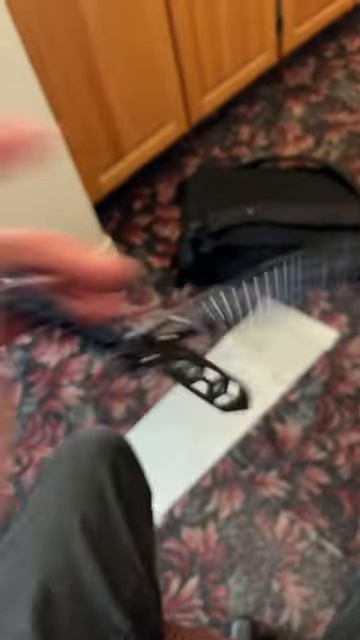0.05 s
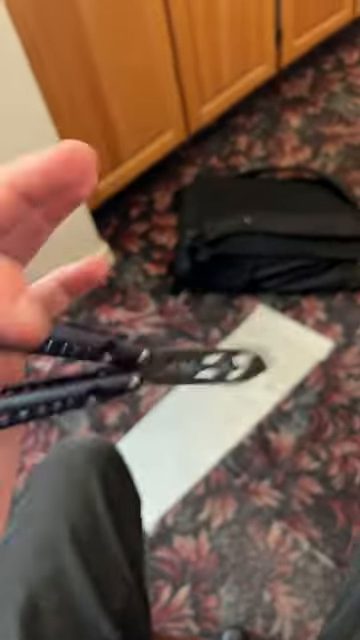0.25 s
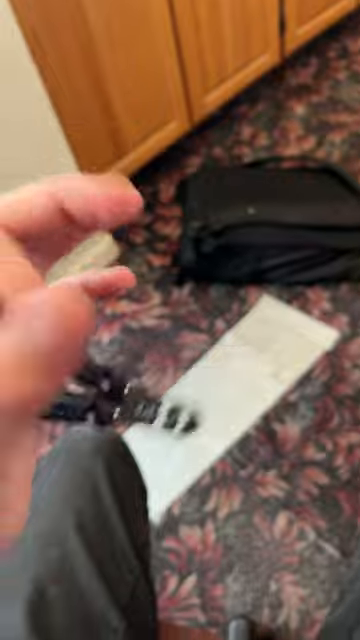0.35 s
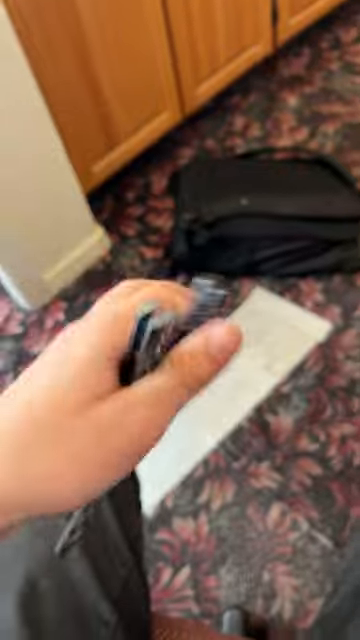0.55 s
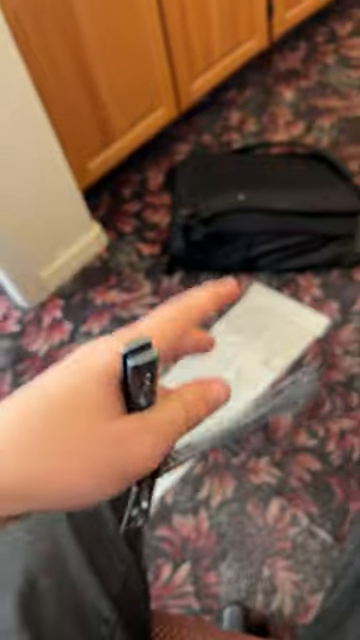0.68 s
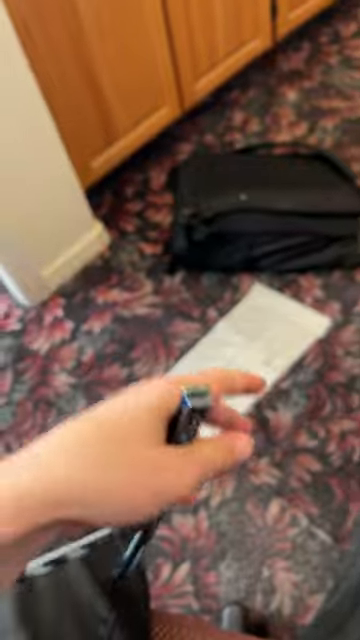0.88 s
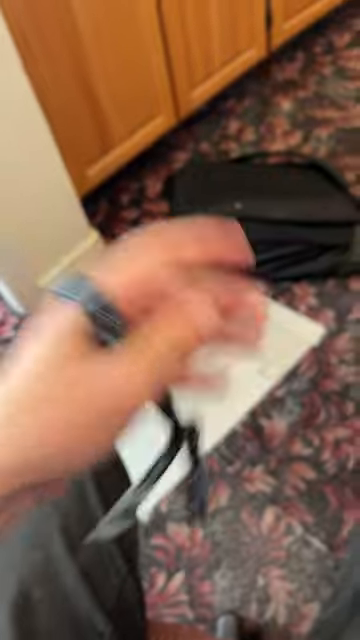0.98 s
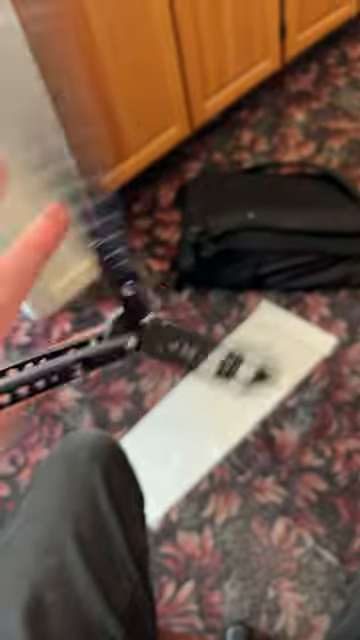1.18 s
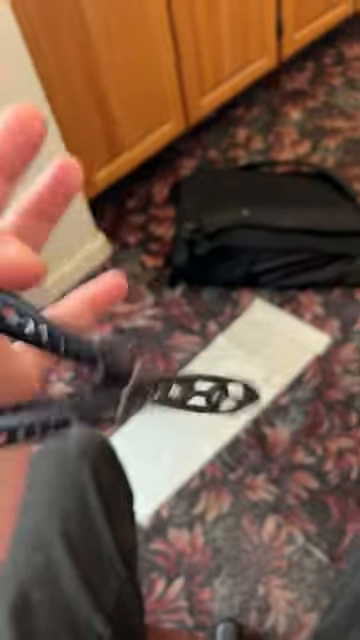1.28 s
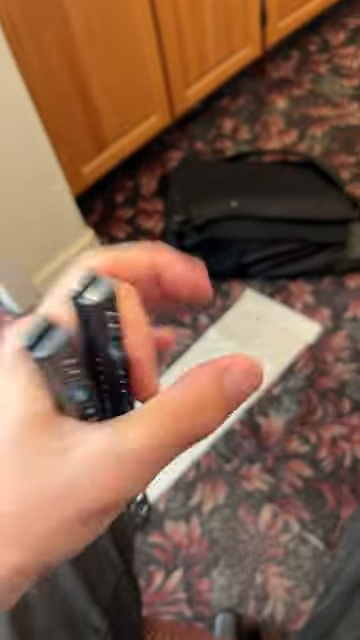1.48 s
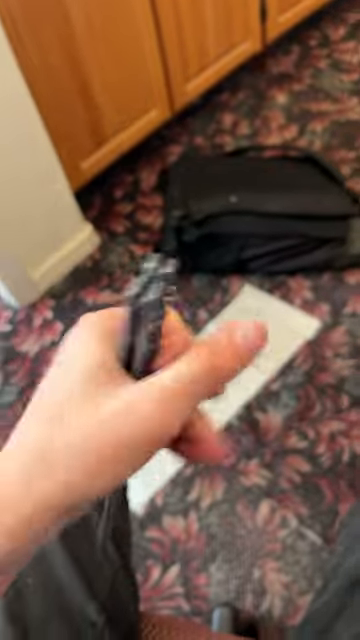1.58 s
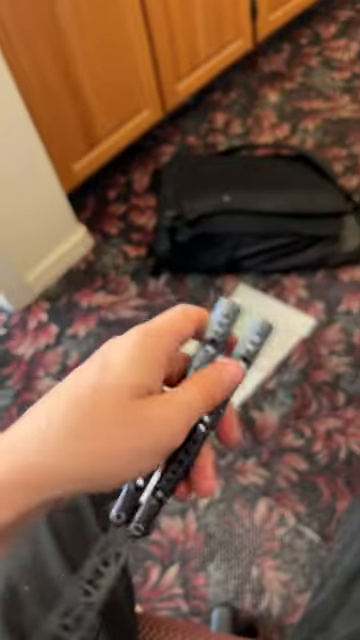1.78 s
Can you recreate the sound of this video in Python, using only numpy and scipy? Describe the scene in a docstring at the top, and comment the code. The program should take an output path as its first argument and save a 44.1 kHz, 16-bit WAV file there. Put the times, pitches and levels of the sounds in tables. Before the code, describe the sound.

A butterfly knife is flipped close to the microphone. Its metal handles tick, then clap together in a quickening rattle. A few lone ticks follow, then a second flip, over a quiet room's faint low hum.

```python
"""A low hum fills a quiet carpeted room. Close to the microphone, a hand flips a butterfly knife.
First the loose handles tick as they swing round. Then they clap together and bounce ever faster,
until the rattle closes into a short buzz. At each touch the steel rings briefly and the room answers.
A few lone ticks follow. Then the hand swishes softly and flips the knife again: ticks, claps, buzz."""
import sys
import numpy as np
from scipy import signal
from scipy.fft import rfft, irfft
from scipy.io import wavfile

SR = 44100
rng = np.random.default_rng(int(sys.argv[2]) if len(sys.argv) > 2 else 0)


def wav_record(signal):
    """Record a signal, one row per channel, as 16-bit PCM in the file named by sys.argv[1]."""
    frames = np.transpose(np.atleast_2d(signal))
    bounded = np.clip(frames, -1, 1)
    # unit amplitude maps onto the largest positive 16-bit level
    quanta = np.round(bounded * 32767).astype(np.int16)
    wavfile.write(sys.argv[1], SR, quanta)


N = 81585
TIME = np.arange(N) / SR


def from_db(db):
    """Turn decibels into a number to multiply a sound by."""
    return 10 ** (np.asarray(db) / 20)


def at_hz(points, hz):
    """Read a table between its rows, with every octave equally wide."""
    pitches, values = np.transpose(points)
    return np.interp(np.log(np.maximum(hz, 1)), np.log(pitches), values)


def noise(colour, size):
    """Noise of strength 1 (rms); its colour table sets the balance of low and high pitches."""
    gains = from_db(at_hz(colour, np.fft.rfftfreq(size, 1 / SR)))
    x = irfft(rfft(rng.standard_normal(size)) * gains, size)
    return x / x.std()


def add(out, start_s, sound):
    """Mix a sound in at a given time."""
    i = int(np.clip(start_s * SR, 0, N - 1))
    out[i:i + len(sound)] += sound[:N - i]


# Colour of the room's air noise: (pitch [Hz], relative level [dB])
AIR_COLOUR = [(15, -51.5), (25, -30.5), (40, -10.5), (85, -12.5), (170, -6.5), (290, -1.5), (420, -7),
              (700, -12), (1000, -11.5), (1500, -22), (2300, -30), (4000, -36.5), (7000, -38),
              (9500, -44.5), (16000, -49)]
# Tones of the hum: (pitch [Hz], level [dB])
HUM_TONES = [(61, -70), (120, -70), (241, -66.5)]

def room_tone(air_db=-59.5):
    """Dull air noise and a steady low hum lie under everything."""
    hum = sum(from_db(db) * np.sqrt(2) * np.sin(2 * np.pi * (hz * TIME + rng.random()))
              for hz, db in HUM_TONES)
    return from_db(air_db) * noise(AIR_COLOUR, N) + hum


# Handle ticks: (time [s], level [dB], treble boost [dB], knock pitch [Hz], relative knock level [dB])
HANDLE_TICKS = [(0.1091, -25.5, -1, 3130, -8), (0.1218, -30.5, -5, 2800, -20),
                (0.1333, -28.5, -7, 2760, -8), (0.1500, -33, 11.5, 2750, -9.5),
                (0.7476, -31.5, 4.5, 2020, -9), (0.7530, -29.5, 0, 2170, -46),
                (0.8820, -30, -5, 2574, -8.5), (1.1539, -19, 0, 3360, -13.5), (1.1552, -30, 10, 3200, -15),
                (1.1648, -25.5, -6.5, 2910, -3), (1.1752, -21.5, 5.5, 1090, -11.5),
                (1.2003, -35, 6, 2780, -16)]
# Colour of a tick's thin crack: (pitch [Hz], relative level [dB])
TICK_COLOUR = [(150, -14.5), (600, -15.5), (1600, -16), (2700, -4.5), (3900, -9), (5300, -10), (6900, -1),
               (7800, -3.5), (8300, -11.5), (10000, -7.5), (12100, 1.5), (13200, -4.5), (14200, -7.5),
               (15600, -7)]

def ticks(ring_db=-13):
    """The loose handles tick lightly as they swing round."""
    out = np.zeros(N)
    for start, db, treble_db, knock_hz, knock_db in HANDLE_TICKS:
        add(out, start, from_db(db) * touch(TICK_COLOUR, ring_db, treble_db, knock_hz, knock_db))
    return out


def crack(colour, t, hold_s=0.0019, fade_s=0.0026, clump_s=0.0016, chatter_fade_s=0.014):
    """A burst of noise as steel meets steel; the loose pivots chatter on in short clumps."""
    colour = [(hz, db + 2.5 * rng.standard_normal()) for hz, db in colour]  # no two cracks are alike
    burst = np.exp(-np.maximum(t - hold_s, 0) / fade_s)
    clumps = np.interp(t / clump_s, np.arange(len(t)), rng.standard_normal(len(t)))
    chatter = from_db(-15.5 + 6.5 * clumps) * np.exp(-t / chatter_fade_s)
    return noise(colour, len(t)) * np.hypot(burst, chatter)


# Ringing tones of the handles and blade: (pitch [Hz], relative level [dB], time to fade by 60 dB [s])
STEEL_TONES = [(2794, -17.5, 0.078), (2880, -18.5, 0.15), (4210, -19, 0.098), (5010, -8.5, 0.044),
               (6180, -13, 0.041), (6960, -11.5, 0.11), (7050, -14, 0.091), (8300, -17, 0.086),
               (9620, -9.5, .05), (10720, -11, 0.04), (11550, -0.5, 0.028), (11900, -0.5, 0.031),
               (11900, -21, 0.056), (13260, -5.5, .055)]

def steel_ring(t, pitch_spread=0.012, level_spread_db=4):
    """Both handles ring, a little differently each time, as the grip and the spot struck vary."""
    hz, db, ring_s = np.transpose(STEEL_TONES + STEEL_TONES)[:, :, None]  # one set for each handle
    hz = hz * (1 + pitch_spread * rng.standard_normal(hz.shape))
    db = db + level_spread_db * rng.standard_normal(hz.shape)
    fade = np.exp(-np.log(1000) * t / ring_s)
    tones = np.sin(2 * np.pi * (hz * t + rng.random(hz.shape)))
    return (from_db(db) * fade * tones).sum(axis=0)


# Colour of the dull thud as the hand takes each blow: (pitch [Hz], relative level [dB])
THUD_COLOUR = [(25, -46), (80, 0), (300, 0.5), (550, -8.5), (1100, -0.5), (1700, -7), (4000, -51)]

def touch(colour, ring_db, treble_db, knock_hz, knock_db, treble_hz=6000, rise_s=0.00069):
    """One touch: steel cracks and rings, the hand thuds, and the grip cuts a hollow knock short."""
    t = np.arange(4096) / SR
    rise = np.minimum(t / rise_s, 1)
    steel = (crack(colour, t) + from_db(ring_db) * steel_ring(t)) * rise
    low = signal.sosfiltfilt(signal.butter(2, treble_hz, fs=SR, output="sos"), steel, padtype=None)
    steel = low + (steel - low) * from_db(treble_db)
    steel *= from_db(-10.5) / steel[t < 0.0041].std()  # set the strength of its first moments
    thud = from_db(-38) * noise(THUD_COLOUR, len(t)) * np.exp(-t / 0.015)
    knock = from_db(knock_db) * np.sin(2 * np.pi * knock_hz * t) * np.exp(-t / 0.0015)
    return steel + (thud + knock) * rise


# Echoes from nearby surfaces: (delay [s], relative level [dB])
NEAR_ECHOES = [(.0052, -15), (.0112, -11.5)]
# Colour of the room's tail, its wash of later echoes: (pitch [Hz], relative level [dB])
TAIL_COLOUR = [(200, -5.2), (1000, -0.58), (2800, -0.12), (4200, 1), (7000, 0), (9500, -4.1), (12000, -6),
               (15000, -3.1)]
# How long that tail lasts: (pitch [Hz], time to fade by 60 dB [s])
TAIL_FADE = [(300, .35), (2800, .38), (5000, .34), (7000, .35), (11000, .28), (15000, .27)]

def room_response(size=24000, tail_db=-9, build_s=0.0063):
    """A click in this room: the click itself, two near echoes and a tail whose treble dies first."""
    t, tail = np.arange(size) / SR, np.zeros(size)
    hiss, pitches = rfft(rng.standard_normal(size)), np.fft.rfftfreq(size, 1 / SR)
    edges_hz = np.linspace(0, 130, 14) ** 2  # 13 bands, wider towards the top
    for low, high in zip(edges_hz, edges_hz[1:]):
        hz = (low + high) / 2
        band = irfft(hiss * ((pitches >= low) & (pitches < high)), size)
        fade = np.exp(-np.log(1000) * t / at_hz(TAIL_FADE, hz))
        tail += band * from_db(at_hz(TAIL_COLOUR, hz)) * fade
    tail *= np.minimum(t / build_s, 1)
    response = from_db(tail_db) * tail / np.linalg.norm(tail)
    response[0] += 1  # the sound that arrives directly
    for delay, db in NEAR_ECHOES:
        smear = rng.standard_normal(48) * np.hanning(48)
        add(response, delay, from_db(db) * smear / np.linalg.norm(smear))
    return response


# Colour of a clap's crack, steel on steel: (pitch [Hz], relative level [dB])
CLAP_COLOUR = [(150, -20.5), (400, -16.5), (900, -12), (1700, -15.5), (2700, -0.5), (3400, -6.5),
               (5000, -4), (5700, -7.5), (7000, -1), (8500, -6.5), (11500, 1.5), (13200, 2), (13900, -10),
               (15700, -3)]

def clap(treble_db, knock_db):
    """The handles hit each other once, ringing more than in a tick."""
    return touch(CLAP_COLOUR, ring_db=-8, treble_db=treble_db, knock_hz=767, knock_db=knock_db)


# Handle claps: (time [s], level [dB], treble boost [dB], relative knock level [dB])
HANDLE_CLAPS = [(0.2158,-12.5,4,-27), (0.2345,-9,5,-25.5), (0.2493,-10.5,7.5,-35), (0.2622,-7.5,8.5,-31.5),
                (0.2675,-27.5,-3,-32), (0.2774,-19.5,-9.5,-31), (0.2920,-12.5,8.5,-30),
                (0.3076,-14.5,3.5,-27), (0.3210,-14,6.5,-35), (0.3340,-19,-2,-27),
                (0.3460,-14.5,12.5,-17.5), (0.3562,-22,-2.5,-11.5), (0.3703,-24.5,-7.5,-35),
                (0.3840,-25,4,-14.5), (0.3977,-30.5,-5.5,-33), (0.4135,-27.5,-1,-24),
                (0.4232,-29.5,-8,-27.5), (0.4313,-27.5,4,-14), (0.4363,-20.5,0.5,-18.5),
                (1.2812,-12.5,0,-16.5), (1.2925,-26.5,-3.5,-33.5), (1.3090,-9.5,-0.5,-25.5),
                (1.3271,-15,-1.5,-26), (1.342,-8,3.5,-34), (1.3478,-21.5,8,-26), (1.3583,-16.5,-1.5,-28),
                (1.3765,-16.5,-1,-22.5), (1.3955,-19.5,-3.5,-11), (1.4120,-20.5,-2,-16), (1.4277,-20,0,-31),
                (1.4413,-19.5,7,-11), (1.4563,-21.5,-6,-17), (1.4687,-23,4.5,-17), (1.482,-25.5,-8,-35),
                (1.4902,-22.5,-6.5,-17)]

def rattles():
    """The handles clap together and bounce again and again."""
    out = np.zeros(N)
    for start, db, treble_db, knock_db in HANDLE_CLAPS:
        add(out, start, from_db(db) * clap(treble_db, knock_db))
    return out


# The buzz that ends each rattle: (start [s], end [s], level [dB])
CLOSING_BUZZES = [(0.4415, 0.467, -27.5), (1.498, 1.556, -26.5)]

def buzzes(first_gap_s=0.0044, last_gap_s=0.0018, max_bounces=24):
    """As the grip closes, the last bounces crowd together into a buzz."""
    out = np.zeros(N)
    for start, end, db in CLOSING_BUZZES:
        now = start
        for gap_wobble, db_wobble in rng.standard_normal((max_bounces, 2)):
            if now < end:
                add(out, now, from_db(db + db_wobble) * clap(treble_db=0, knock_db=-20))
            gap = np.interp(now, [start, end], [first_gap_s, last_gap_s])
            now += gap * np.exp(0.17 * gap_wobble)
    return out


# Swishes of the swinging hand: (time [s], level [dB])
HAND_SWISHES = [(1.083, -64.5), (1.246, -60.5)]
# Colour of a swish: (pitch [Hz], relative level [dB])
SWISH_COLOUR = [(600, -23), (1200, -4), (1500, 7.5), (1950, 4), (2300, -26), (5000, -54.5)]

def swishes(width_s=0.053):
    """The hand swishes faintly as it winds up for the second flip."""
    swells = sum(from_db(db) * np.exp(-((TIME - middle) / width_s) ** 2) for middle, db in HAND_SWISHES)
    return noise(SWISH_COLOUR, N) * swells


def scene():
    """The knife echoes in the room, over the air noise, hum and swishes."""
    background = room_tone() + swishes()
    room = room_response()
    knife = ticks() + rattles() + buzzes()
    return (signal.fftconvolve(knife, room)[:N] + background)[None]


def record(dry, low_cut_hz=37, high_cut_hz=15780):
    """The microphone loses the deepest bass; the highest treble is cut off steeply."""
    x = signal.sosfilt(signal.butter(2, low_cut_hz, "high", fs=SR, output="sos"), dry)
    return signal.sosfilt(signal.ellip(12, .2, 75, high_cut_hz, fs=SR, output="sos"), x)


dry = scene()
out = record(dry)
wav_record(out)
```